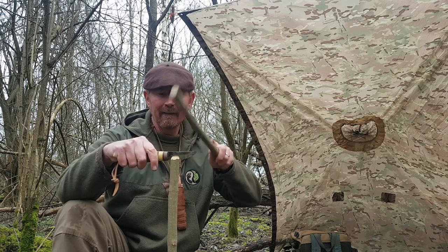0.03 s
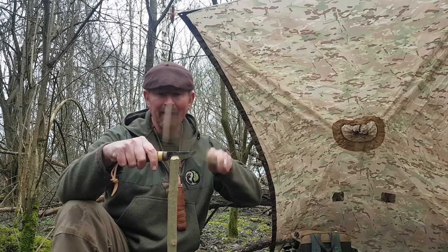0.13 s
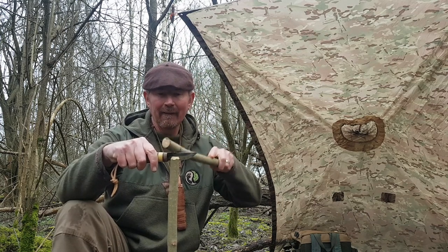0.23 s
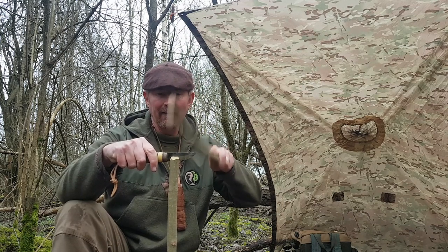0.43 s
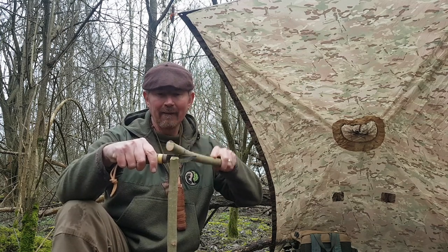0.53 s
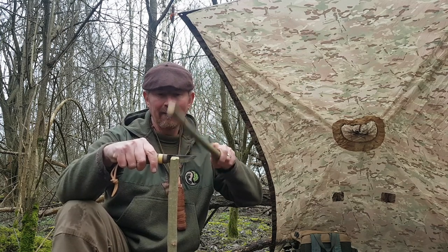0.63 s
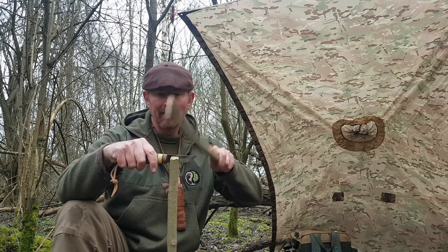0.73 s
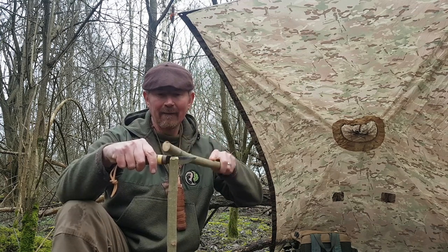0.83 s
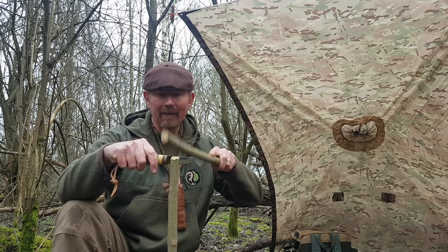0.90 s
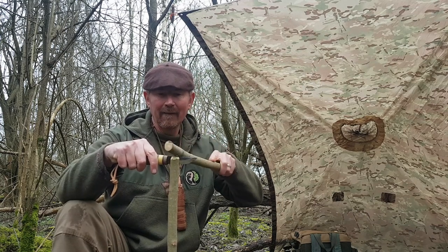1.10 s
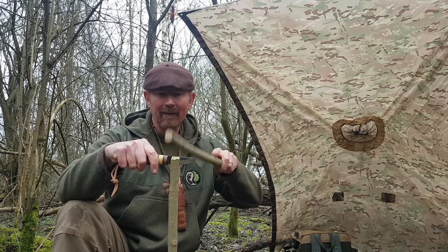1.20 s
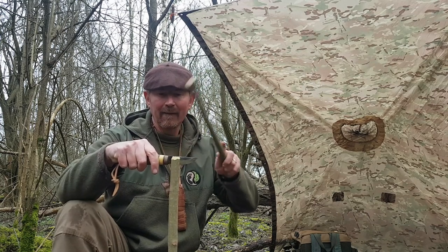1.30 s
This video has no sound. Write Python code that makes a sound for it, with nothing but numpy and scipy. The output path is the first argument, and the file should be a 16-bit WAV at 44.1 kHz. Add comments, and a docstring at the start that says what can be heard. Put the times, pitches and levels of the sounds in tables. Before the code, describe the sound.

Four steady taps of wood on a steel blade, each a quick double contact with a short clack and soft ground thud; light echoes from trees, small ticks, faint birds and a low outdoor rumble behind.

```python
"""A wooden baton taps a knife blade into an upright stake four times, outdoors in a wood.
Each tap is a touch and a strike a moment later: short-lived tones of steel and wood, with one probably
from the microphone, a crack of noise, and low swings as the stake thuds into the ground.
Echoes and scattered taps make the tail from the trees. Shaped noise makes distant traffic rumble and hiss,
fuzzy sines make faint birds, and short bursts of noise make small ticks and a scrape."""
import sys
import numpy as np
from scipy import signal
from scipy.fft import rfft, irfft
from scipy.io import wavfile
from scipy.ndimage import uniform_filter1d

SR = 44100
rng = np.random.default_rng(int(sys.argv[2]) if len(sys.argv) > 2 else 0)


def volts(x):
    """Linear amplitude factor 10**(x/20) for a level x in dB, scalar or array-like."""
    e = np.asarray(x, float) / 20
    return 10 ** e


def to_wav(s):
    """Save 16-bit WAV."""
    ch = np.atleast_2d(s).T  # columns
    pcm = np.round(np.clip(ch, -1, 1) * 32767)  # PCM
    wavfile.write(sys.argv[1], SR, pcm.astype(np.int16))


N = 59535  # length in samples


def read(points, hz):
    """Reads a curve given as points, along a logarithmic pitch scale."""
    f, value = np.transpose(points)
    return np.interp(np.log(hz + 1), np.log(f + 1), value)


def evened(x):
    """Scales a sound to an rms of 1."""
    return x / np.sqrt(np.mean(x ** 2) + 1e-20)


def add(mix, s, sound):
    """Adds a sound to the mix from s seconds on, cut off where the mix ends."""
    part = mix[:, round(s * SR):][:, :sound.shape[-1]]
    part += sound[..., :part.shape[1]]


def resonate(x, hz, width):
    """A resonance of gain 1 that can follow a pitch curve: shift down, smooth, shift back up."""
    turn = np.exp(2j * np.pi * np.cumsum(hz * np.ones(x.shape[-1])) / SR)
    r = np.exp(-np.pi * width / SR)
    smooth = signal.lfilter([1 - r], [1, -r], x / turn)
    return 2 * (turn * smooth).real


def burst(colour, t60):
    """A spit of coloured noise that starts almost at once and dies fast."""
    hz, t = np.fft.rfftfreq(2048, 1 / SR), np.arange(2048) / SR
    spectrum = rfft(rng.standard_normal(2048)) * volts(read(colour, hz))
    rise = np.minimum(t * SR / 6, 1)  # six samples long
    return evened(irfft(spectrum)) * volts(-60 * t / t60) * rise


# Colour of the background air: pitch_hz, relative level_db
AIR_COLOUR = [(15, -33.5), (25, -25.5), (74, 2), (389, -18), (553, -14.5), (831, -12.5), (952, -17.5),
              (2460, -29), (2980, -31), (3510, -38), (3910, -38), (4480, -39), (8600, -51), (15200, -44.5),
              (16500, -54.5)]
# How alike the two sides are: pitch_hz, likeness (-1 to 1, no unit)
AIR_LIKENESS = [(60, 1), (180, 0.95), (550, 0.47), (1650, -0.43), (4970, 0.17), (15000, -0.52)]
# Balance of the two sides: pitch_hz, left_minus_right_db
AIR_LEAN = [(60, 2), (110, -2.5), (200, 0.5), (380, 0), (700, 3), (1290, 4.0), (2380, 5), (4400, 7.5),
            (8120, 5), (15000, -1.5)]
AIR_DB = -47.5  # rms of the average of both sides


def air():
    """Distant traffic rumble and hiss: random spectra with faint drifting patches."""
    frames, hz = N // 512 + 5, np.fft.rfftfreq(2048, 1 / SR)
    a, b, c, d, patches = rng.standard_normal((frames, 1025, 5)).T
    patches = uniform_filter1d(patches, 20, 0)  # smooth across pitch
    patches = evened(uniform_filter1d(patches, 6, 1))  # smooth across time
    likeness = np.clip(read(AIR_LIKENESS, hz), -1, 1)[:, None]
    left = a + 1j * b
    right = likeness * left + np.sqrt(1 - likeness ** 2) * (c + 1j * d)
    lean = read(AIR_LEAN, hz)[:, None] * np.array([.5, -.5])[:, None, None]
    level_db = read(AIR_COLOUR, hz)[:, None] + lean + 1.8 * patches
    spectra = np.array([left, right]) * volts(level_db)
    x = signal.istft(spectra, nperseg=2048, noverlap=1536)[1][:, :N]
    return volts(AIR_DB) * x / np.sqrt(np.mean(x.mean(0) ** 2))


# Three bird whistles, each a curve through points: time_s, pitch_hz, level_db
BIRD_UP = [(.39, 3540, -81), (.41, 3610, -65.5), (.455, 4140, -69.5), (.48, 3960, -65), (.51, 3800, -75)]
BIRD_LONG = [(.6, 4250, -79), (.66, 4470, -77), (.75, 4370, -82.5), (.82, 4400, -87.5)]
BIRD_END = [(1.24, 3700, -77), (1.28, 3740, -71.5), (1.35, 3650, -70)]


def birds():
    """Three far whistles, each a sine made slightly fuzzy by noise resonating at its pitch."""
    width_hz, fuzz_share = 60, .4
    t, out = np.arange(N) / SR, np.zeros((2, N))
    for curve in (BIRD_UP, BIRD_LONG, BIRD_END):
        s, hz, db = np.transpose(curve)
        pitch = np.interp(t, s, hz)
        fuzz = evened(resonate(rng.standard_normal((2, N)), pitch, width_hz))
        tone = np.sqrt(2) * np.sin(2 * np.pi * np.cumsum(pitch) / SR)
        out += (tone + fuzz_share * fuzz) * volts(np.interp(t, s, db, -140, -140))
    return out


# Small dry ticks: start_s, level_db (before the left-right lean), t60_s (time to fall by 60 dB)
TICKS = [(.467, -63, .015), (.9047, -49, .016), (.9232, -43, .02), (1.007, -64, .015)]
# Colour of a tick: pitch_hz, relative level_db
TICK_COLOUR = [(1200, -40), (2600, -12), (4300, -7), (5800, -1), (6800, -14), (7700, -7), (9200, -18),
               (12500, 0), (14500, -3), (16500, -10)]
# A short scrape in three catches: start_s, level_db (before the lean), t60_s
SCRAPES = [(.0857, -42, .03), (.0912, -46, .025), (.0965, -48, .035)]
# Colour of the scrape: pitch_hz, relative level_db
SCRAPE_COLOUR = [(900, -30), (1600, -12), (3300, -9), (4300, 0), (4900, -6), (5800, 0), (7200, -16),
                 (8500, -25), (14000, -22), (16500, -30)]


def ticks():
    """Short dry snaps and a scrape nearby: noise bursts that lean to the left."""
    lean_db = np.array([[7.5], [-7.5]]) / 2
    out = np.zeros((2, N))
    for rows, colour in ((TICKS, TICK_COLOUR), (SCRAPES, SCRAPE_COLOUR)):
        for s, db, t60 in rows:
            a, b = burst(colour, t60), burst(colour, t60)
            sides = np.array([a, .8 * a + .6 * b])  # alike but not the same
            add(out, s, sides * volts(db + lean_db))
    return out


def scatter(x, t60_of_hz, start_s):
    """Sparse echoes of random sign, each pitch band dying at its own speed."""
    taps = np.zeros((2, SR // 2))
    at = np.arange(round(start_s * SR), SR // 2 - 20, 20)
    at = at + rng.integers(0, 20, (2, len(at)))
    np.put_along_axis(taps, at, rng.choice([-1., 1.], at.shape), 1)
    hz, t, z = signal.stft(taps, SR, nperseg=128)
    decay = volts(-60 * t / read(t60_of_hz, hz)[:, None])
    tail = signal.istft(z * decay, SR, nperseg=128)[1]
    return signal.fftconvolve(x, tail / np.linalg.norm(tail[0]), axes=1)[:, :x.shape[1]]


# Colour of the blow's broad rattle as the surroundings return it: pitch_hz, relative level_db
RATTLE_COLOUR = [(500, -36), (900, -7), (2000, 2), (3100, 6.5), (4500, -6), (6000, 2), (7500, -12),
                 (9500, -22), (13500, -19), (16500, -25)]
# Echoes from tarp and ground: delay_s, level_db
ECHOES = [(0.0105, -18.5), (0.02, -35.5)]
# How long the trees' tail lasts: pitch_hz, t60_s
TREES = [(500, 0.22), (2000, 0.38), (4000, 0.48), (7000, 0.23), (10000, .3), (15000, 0.34)]
NEAR_T60, NEAR_DB = 0.066, -10  # scatter close by: seconds, dB
TREES_DB = -25.5


def surroundings(hit, ring_db):
    """What tarp, ground and trees send back: the blow and a rattle, echoed and scattered."""
    ring_back, cross = 0.59, .3  # share returned, share of the other side mixed in
    returned = ring_back * (hit + cross * hit[::-1])
    rattle = burst(RATTLE_COLOUR, 0.0095) * volts(ring_db + np.array([[0], [-4]]))
    add(returned, 0, rattle)
    wet = volts(NEAR_DB) * scatter(returned, [(500, NEAR_T60)], .003)
    wet += volts(TREES_DB) * scatter(returned, TREES, 0.022)
    for delay, db in ECHOES:
        add(wet, delay, volts(db) * returned)
    return wet


def swings(modes):
    """Low swings of stake and soil, the same on both sides but slightly later on the right."""
    right_lag_s = .0003
    hz, db, t60, rise, delay, sign = np.array(modes).T[:, :, None, None]
    t = np.maximum(np.arange(12000) / SR - delay - np.array([[0], [right_lag_s]]), 0)
    envelope = volts(db - 60 * t / t60) * (1 - np.exp(-t / rise))
    return (np.sign(sign) * np.sin(2 * np.pi * hz * t) * envelope).sum(0)


# The stake pushed into the soil: start_s, knock_db, thud_db
THUDS = [(.2124, -27.5, -22), (.5191, -24.5, -25.5), (.8296, -27, -23.5), (1.1491, -20.5, -21.5)]
# Higher swings (knock): pitch_hz, relative level_db, t60_s, rise_s, delay_s, polarity (no unit)
KNOCK = [(312, 1, 0.019, 0.00054, 0.0009, -1), (477, -3.5, 0.036, 0.0017, 0.00077, -1),
         (190, -3.5, 0.036, 0.00039, 0.0024, 1)]
# Lowest swings (thud): pitch_hz, relative level_db, t60_s, rise_s, delay_s, polarity (no unit)
THUD = [(108.2, -1, 0.086, 0.0029, 0.0023, 1), (84.5, -4.5, 0.14, 0.01, 0.0039, -1)]


def thuds():
    """Each tap drives the stake into the soil, which answers with a knock and a deeper thud."""
    out = np.zeros((2, N))
    for s, knock_db, thud_db in THUDS:
        add(out, s, volts(knock_db) * swings(KNOCK) + volts(thud_db) * swings(THUD))
    return out


# Colour of the crack at each contact: pitch_hz, relative level_db
CRACK_COLOUR = [(4410, -27), (7500, -6.5), (8760, -14), (10800, -6.5), (14300, 2), (15800, -6),
                (16500, -18)]


def crack(crack_db):
    """The sharp noise of two hard surfaces meeting, 20 dB weaker on the right."""
    t60_s = 0.0074
    return burst(CRACK_COLOUR, t60_s) * volts(crack_db + np.array([[0], [-20]]))


# Ringing tones of blade and stake, with what is probably the microphone's own resonance near 6.1 kHz
# (pitch and level vary a little at each contact):
# pitch_hz, relative level_db, t60_s, rise_s, steel_share (0 to 1), right_db (against left), right_lag_rad
RING = [(912, -9.5, 0.017, .0005, 0.04, -16, 2.98), (1088, -5.5, 0.017, 0.00046, 0.5, -1, 1.61),
        (1450, -8.5, 0.022, 0.00099, 0.03, -16.5, 2.3), (1820, -4.5, 0.022, 0.00069, 0, 2, 1.7),
        (2017, 2.5, 0.019, 0.00067, 0, -12, 0.77), (2872, -0.5, 0.017, 0.001, 0.01, 2, 1.54),
        (3109, -2, 0.047, 0.00072, 0.1, -7.5, 1.1), (3390, -10.5, 0.021, 0.00033, 0, -4.5, -0.5),
        (3935, -7.5, 0.03, 0.00087, 0.3, -13, 6.4), (4250, -0.5, 0.023, 0.00063, 0.4, -11.5, 4.95),
        (5366, -4.5, 0.022, 0.00033, 0.59, -19.5, 3.7), (6066, 3.5, 0.011, .0003, 1, -16.5, 4.5),
        (7550, -18, 0.025, .0004, 0.3, -26, 1.5)]


def ring(steel_db, spot_hz, lift_db):
    """One touch sets off the tones of blade, stake and microphone, and favours those near one pitch."""
    spread_db, detune = 1.5, .005  # each contact lands a little differently
    hz, db, t60, rise, steel, right_db, lag = np.array(RING).T[:, :, None]
    t = np.arange(6000) / SR
    a, b = rng.standard_normal((2, len(RING), 1))
    favoured_db = lift_db * np.exp(-(np.log(hz / spot_hz) / 0.069) ** 2)
    level_db = db + steel * steel_db + spread_db * a + favoured_db
    shape = volts(level_db - 60 * t / t60) * (1 - np.exp(-t / rise))
    turn = 2 * np.pi * hz * (1 + detune * b) * t
    left = (shape * np.sin(turn)).sum(0)
    right = (shape * volts(right_db) * np.sin(turn - lag)).sum(0)
    return np.array([left, right])


# Touch and strike of each tap in turn: start_s
CONTACT_S = [.2126, .2132, .5192, .5207, .8298, .832, 1.1492, 1.1517]
# Each contact: ring_db, steel_db, crack_db, spot_hz (pitch favoured by where it lands), lift_db (its boost)
CONTACTS = [(-18.5, -11.5, -43, 950, 10), (-12.5, 8, -15.5, 1160, 6), (-22.5, -17, -30, 2700, 6),
            (-11, 0.5, -15, 1032, 1), (-21.5, 2, -27, 1450, 8.5), (-10.5, -7.5, -35, 3135, 3.5),
            (-19.5, 3, -22.5, 5320, 4.5), (-19, -3.5, -24, 5400, 13)]


def taps():
    """Each contact of baton, blade and stake rings and cracks, and the surroundings answer."""
    out = np.zeros((2, N))
    for s, (ring_db, steel_db, crack_db, spot_hz, lift_db) in zip(CONTACT_S, CONTACTS):
        hit = np.zeros((2, SR // 2))
        add(hit, 0, volts(ring_db) * ring(steel_db, spot_hz, lift_db))
        add(hit, 0, crack(crack_db))
        add(out, s, hit + surroundings(hit, ring_db))
    return out


def scene():
    """Everything heard, from the background to the taps."""
    return air() + birds() + ticks() + thuds() + taps()


def low_pass(x):
    """Removes everything above the highest recorded frequency."""
    return signal.sosfilt(signal.butter(12, 17110, fs=SR, output="sos"), x)


def record(dry):
    """The camera's band limit: a steep filter removes the treble above its edge."""
    edge_hz = 16900
    edge = signal.firwin(255, edge_hz, window=("kaiser", 9), fs=SR)
    mix = signal.oaconvolve(dry, edge[None], "same")
    return low_pass(mix)


dry = scene()
out = record(dry)
to_wav(out)
```